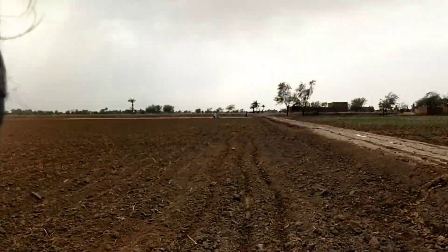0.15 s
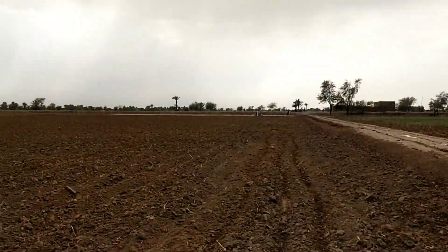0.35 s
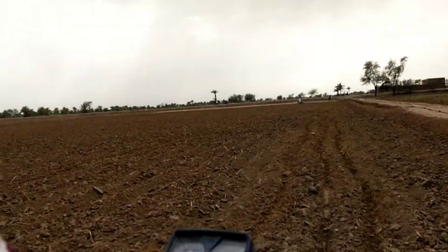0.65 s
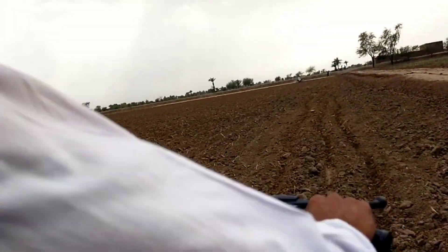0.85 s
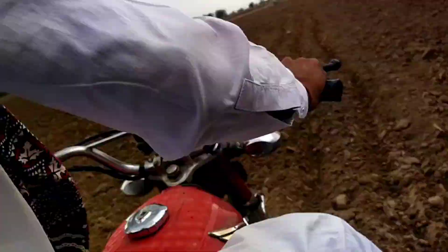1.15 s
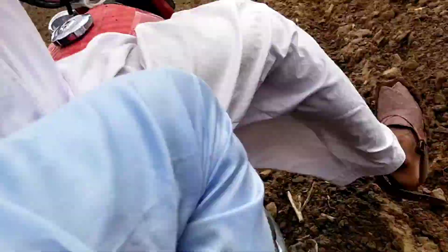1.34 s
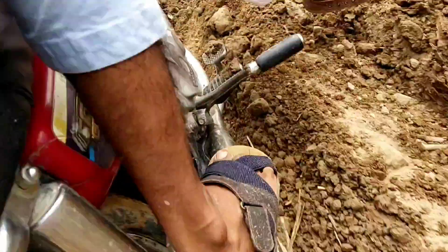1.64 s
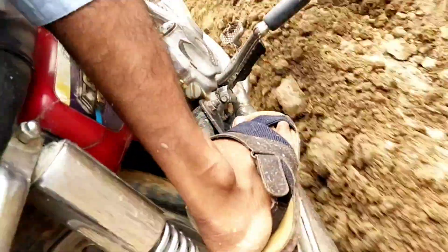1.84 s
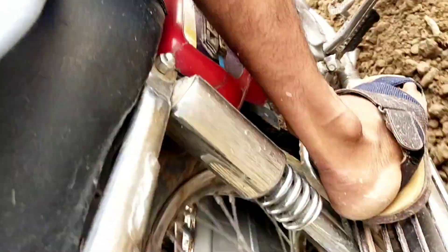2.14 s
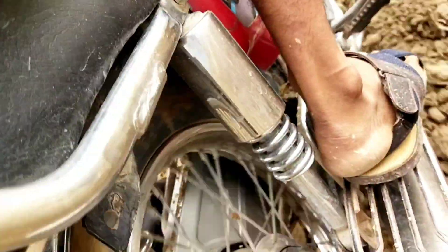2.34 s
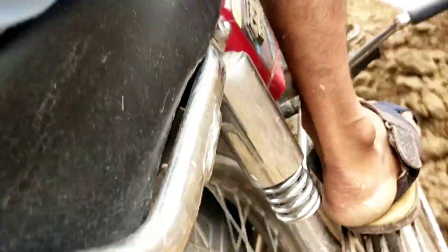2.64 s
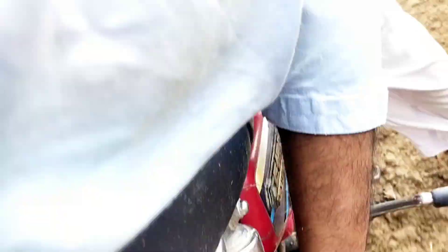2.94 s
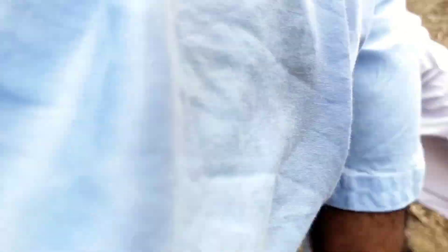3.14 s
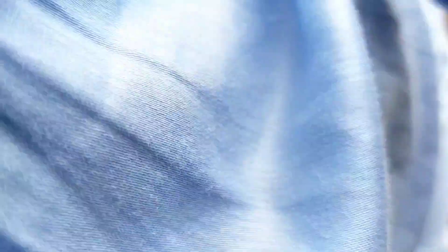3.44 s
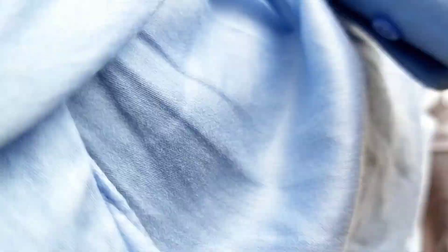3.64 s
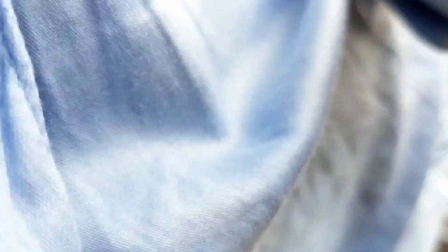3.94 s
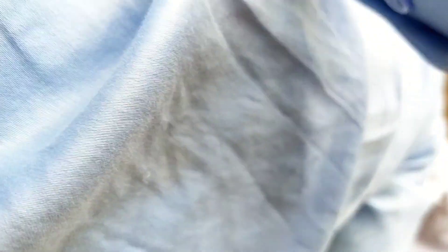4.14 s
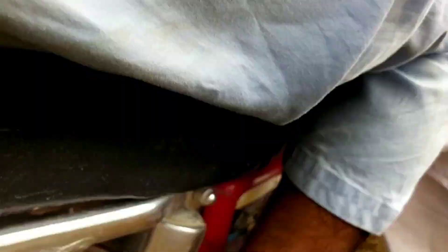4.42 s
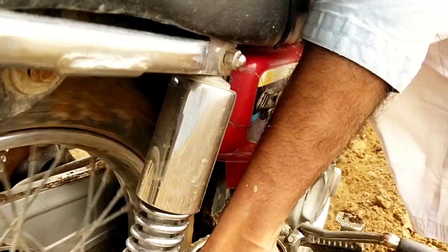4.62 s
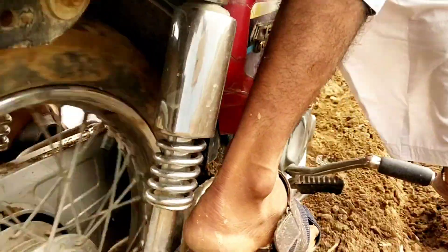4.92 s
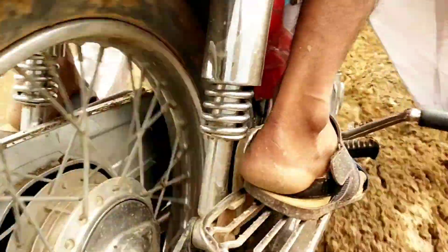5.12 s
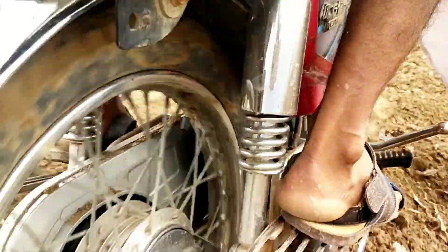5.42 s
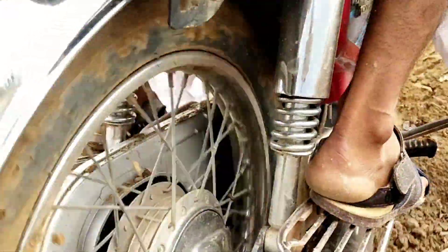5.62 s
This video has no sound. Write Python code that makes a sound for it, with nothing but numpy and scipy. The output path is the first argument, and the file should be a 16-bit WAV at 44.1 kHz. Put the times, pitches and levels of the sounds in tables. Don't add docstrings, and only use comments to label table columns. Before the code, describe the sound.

A small single-cylinder motorcycle idles continuously in an open field, about 27 uneven beats a second. A handheld phone starts near the rider's shoulder, where boom, intake thud and wind rumble are fuller, then swings down to the rear wheel, where dry pops and hissy puffs dominate. Metallic overtones swell and fade with the movement. Very close, slightly saturated stereo, no audible room.

```python
import sys
import numpy as np
from scipy import signal
from scipy.fft import rfft, irfft, next_fast_len
from scipy.io import wavfile
from scipy.ndimage import uniform_filter1d, map_coordinates

SR = 44100
rng = np.random.default_rng(int(sys.argv[2]) if len(sys.argv) > 2 else 0)


def voltage_ratio(decibels):
    exponent = np.asarray(decibels, float) / 20
    return 10 ** exponent


def master(y):
    cut = np.clip(np.atleast_2d(y).T, -1, 1)
    pcm = np.round(cut * 32767)
    wavfile.write(sys.argv[1], SR, pcm.astype(np.int16))


N = 254456
TIME = np.arange(N) / SR
ECHO_S = 0.00621

# (time [s], silencer body in view [dB],
# left ear later than right [ms], air box in view [dB], blow level [dB])
PHONE = [(0.0, -6, -0.17, -14, -2.5), (0.15, -4, -0.14, -8.5, -0.5), (0.5, -2, 0.027, -13.5, -2.5),
         (0.87, -4, -0.034, -12, -1.5), (1.2, -4.5, -0.086, -14.5, -3), (1.42, -13, -0.145, -31, 0.5),
         (1.8, -12, -0.15, -22, 0), (2.0, -13.5, -0.3, -26, -2), (2.2, -10, -0.31, -23, -1.5),
         (2.6, -13, -0.29, -24, -2.4), (3.05, -6, -0.15, -22.5, 0), (3.42, -10, -0.14, -27, -2.5),
         (3.6, -11.5, -0.128, -23.5, -3.5), (4.2, -14, 0.11, -38, -4.5), (4.5, -15, 0.23, -39, -1),
         (5.0, -12.5, 0.15, -39, -2), (5.4, -17, 0.13, -40, -1), (5.77, -15, 0.16, -30, -4.5)]


def evened(x):
    return x / np.sqrt(np.mean(x ** 2) + 1e-20)


def column(table, index, t=TIME):
    rows = np.array(table)
    return np.interp(t, rows[:, 0], rows[:, index])


def coloured(x, points):
    hz, db = np.transpose(points)
    size = next_fast_len(N)
    bins = np.fft.rfftfreq(size, 1 / SR)
    gain = voltage_ratio(np.interp(np.log(bins + 1), np.log(hz), db))
    return irfft(rfft(x, size) * gain, size)[..., :N]


def resonated(x, modes):
    total = 0
    for hz, width, db in modes:
        total = total + voltage_ratio(db) * signal.lfilter(*signal.iirpeak(hz, hz / width, SR), x)
    return total


def gliding(x, hz, width):
    turn = np.exp(2j * np.pi * np.cumsum(hz) / SR)
    r = np.exp(-np.pi * width / SR)
    return 2 * (turn * signal.lfilter([1 - r], [1, -r], x / turn)).real


def pair(same):
    common, left, right = rng.standard_normal((3, N))
    same = np.clip(same, 0, 1)
    return np.sqrt(same) * common + np.sqrt(1 - same) * np.array([left, right])


def patchy(x, patchy_db):
    z = signal.stft(x, nperseg=256)[2]
    spots = rng.standard_normal(z.shape[1:])
    spots = evened(uniform_filter1d(uniform_filter1d(spots, size=5, axis=0), size=7, axis=1))
    return signal.istft(z * voltage_ratio(patchy_db * spots), nperseg=256)[1][:, :N]


def burst(since, rise, fall):
    return np.exp(-np.maximum(since, 0) / fall) * np.exp(-(np.minimum(since, 0) / rise) ** 2)


def firings():
    # (firing number, gap to the next firing [ms])
    idle = [(0.0, 33.278), (10.66, 39.562), (23.6, 53.559), (30.96, 33.163), (46.84, 38.152),
            (51.98, 37.162), (57.01, 45.748), (63.4, 38.78), (66.53, 42.096), (82.64, 41.903),
            (83.84, 37.985), (105.78, 36.797), (112.7, 33.298), (122.61, 36.095), (127.15, 33.094),
            (133.0, 39.397), (137.5, 32.172), (150.0, 37.477)]
    first_firing_s = 0.0117
    number, gap_ms = np.transpose(idle)
    fired = np.cumsum(np.interp(np.arange(-10, 156) + .5, number, gap_ms)) / 1000
    return first_firing_s + fired - fired[9]


def cycle(fired, lead):
    number = np.searchsorted(fired - lead, TIME) - 1
    since = TIME - fired[number]
    return number, since, since / np.diff(fired)[number]


def speeding(fired):
    return 1 / np.gradient(fired) - 27


def in_view():
    return column(PHONE, index=1) + 13


def wind():
    # (frequency [Hz], density [dB per Hz])
    wind_colour = [(15, 17), (30, 36), (40, 39), (52, 0), (100, 4), (220, -14), (600, -18)]
    lumps = evened(uniform_filter1d(uniform_filter1d(rng.standard_normal(N), size=5000), size=5000))
    high_db = 1.4 * (in_view() + 4)
    return voltage_ratio(-40 + high_db + 0.83 * lumps) * evened(coloured(pair(0.092), wind_colour))


def rustle(fired):
    # (frequency [Hz], density [dB per Hz])
    rustle_colour = [(900, 6.5), (1800, -2.5), (3200, -3), (5500, -11.5), (6800, -6), (8100, -14),
                     (15200, -23)]
    _, _, share = cycle(fired, lead=0)
    valves = 0.19 + 0.51 * np.exp(-((share - .63) / 0.081) ** 2) + .5 * np.exp(-((share - .9) / 0.17) ** 2)
    drops = (rng.random((2, N)) < 400 / SR) * voltage_ratio(3.0 * np.minimum(rng.exponential(1, (2, N)), 4))
    patter = signal.lfilter([1, -1], [1, -.8], drops)
    busy_db = 0.69 * np.interp(TIME, fired, speeding(fired)) + 0.53 * in_view()
    noise = valves * patchy(pair(0.27), patchy_db=3.5) + 0.071 * evened(patter)
    return voltage_ratio(-28 + busy_db) * evened(coloured(noise, rustle_colour))


def intake(fired, luck):
    number, _, share = cycle(fired, lead=0)
    opening = share - .66
    thud = np.cos(2 * np.pi * 11.3 * opening) * burst(opening, rise=0.035, fall=0.53)
    thud = thud * voltage_ratio(4.4 * luck[number, 3])
    hz = uniform_filter1d(9.65 / np.diff(fired)[number], size=2000)
    rumble = resonated(pair(0.14), [(105, 43, 0.0), (218, 39, -2.6)])
    rumble = evened(resonated(rumble, [(157, 120, 0)]))
    gurgle = evened(gliding(gliding(pair(0.81), hz, width=190), hz, width=190))
    gurgle = gurgle * (0.11 + np.exp(-((share - .8) / 0.37) ** 2))
    return voltage_ratio(column(PHONE, index=3) - 6.5) * evened(evened(thud) + 0.67 * gurgle + .5 * rumble)


def lobes_db(tone):
    # (middle [s], half length [s], swell [dB])
    swells = [
        [(.3, .35, 15.5), (1.4, 0.34, 19.5), (1.78, 0.22, 7.5), (3.3, 0.67, 13.5), (4.0, 0.43, 5.5)],
        [(.3, 0.82, 13.5), (1.1, 0.34, 2), (2.493, .2, 8), (3.25, 0.58, 19), (5.2, 1, 9)],
        [(.25, 0.35, 11.5), (1.3, 0.12, 6.5), (2.0, .1, 6), (3.0, 0.23, 11), (3.6, 0.32, 11.5)],
        [(.35, 0.36, 14.5), (.9, 0.13, 6), (1.3, 0.13, 5), (2.0, 0.22, 9), (3.05, .2, 6), (3.602, 0.4, 16.5),
         (4.6, 0.24, 7), (5.4, 0.34, 8.5)],
        [(1.8, 0.73, 8), (3.7, 0.87, 8.5), (4.7, .3, 7.5)],
        [(.4, .15, 17), (3.0, .2, 26), (3.55, 0.38, 27), (5.4, 0.18, 9)],
    ]
    floors_db = [-40, -42, -38.5, -41.5, -39, -56]
    bells = sum(db * np.exp(-((TIME - middle) / half) ** 2) for middle, half, db in swells[tone])
    return floors_db[tone] + bells


def overtones(fired):
    # (frequency [Hz], width [Hz], level [dB])
    tone_modes = [
        [(621, 70, 0.5), (465, 150, 1.5)],
        [(732.6, 98, 0)],
        [(1010, 48, 6.5), (1117, 265, 10.5)],
        [(1294, 86, 8), (1595, 95, 0), (1464, 630, 4)],
        [(382, 117, 0)],
        [(884, 100, 0)],
    ]
    _, since, share = cycle(fired, lead=0.0064)
    strikes = evened(np.diff(cycle(fired, lead=0)[0], prepend=0).clip(0, 1))
    gas = 1.5 + 1.9 * burst(since - .001, rise=0.0029, fall=0.03)
    gas = gas + 2.4 * np.exp(-((share - .8) / 0.39) ** 2)
    flow = evened(gas * pair(.9)) + 2.2 * strikes
    drive = signal.lfilter([1, -1], [1, -.93], flow)
    total = 0
    for tone, modes in enumerate(tone_modes):
        ring = evened(resonated(resonated(drive, modes), modes))
        total = total + voltage_ratio(lobes_db(tone)) * ring
    return voltage_ratio(-1.0) * total


def jet(fired, luck):
    # (frequency [Hz], width [Hz], level [dB])
    whistle_modes = [(2200, 290, -2), (2800, 440, 1), (3150, 260, 3.5), (3690, 790, -1.5),
                     (4000, 650, -2.5)]
    # (frequency [Hz], density [dB per Hz])
    jet_colour = [(1000, -3), (1900, -8.5), (4200, 1), (6600, 1), (7600, -10.5), (8600, -1), (11000, -3),
                  (15200, -5.5)]
    # (frequency [Hz], width [Hz], level [dB])
    shell_modes = [(6330, 130, -2.5), (6850, 180, -2), (7250, 370, -1.5)]
    # (time [s], whistle level [dB], whistle centre [Hz], jet level [dB])
    outlet = [(0.05, -25, 2940, -36.5), (0.22, -26, 3030, -31.5), (0.38, -25.5, 3030, -28),
              (0.65, -26.5, 2950, -29.5), (1.0, -25, 2740, -30.5), (1.2, -19.5, 2700, -30.5),
              (1.45, -30.5, 2440, -32), (1.75, -32, 2930, -28.5), (2.05, -21.5, 2860, -28),
              (2.62, -25, 3150, -26.5), (3.05, -29.5, 2780, -30), (3.5, -26, 3240, -28.5),
              (3.75, -24.5, 2820, -26), (4.15, -22, 3600, -25.5), (4.6, -26.5, 3150, -27),
              (5.05, -25.5, 2410, -27), (5.3, -16.5, 2760, -32), (5.77, -16, 2700, -23)]
    number, since, _ = cycle(fired, lead=0.0035)
    flow = burst(since - .0012, rise=0.00085, fall=0.0019)
    flow = flow + .11 * burst(since - ECHO_S, rise=.003, fall=.002)
    flow = flow + 0.048 * burst(since, rise=0.0013, fall=0.023)
    late = burst(since - .002, rise=0.0032, fall=0.0018)
    late = late + 0.4 * burst(since - ECHO_S - .002, rise=0.0071, fall=0.0065)
    whistle_luck = voltage_ratio(1.3 * luck[number, 1])
    hiss_luck = voltage_ratio(1.1 * luck[number, 2])
    whistle = resonated(late * whistle_luck * pair(0.49), whistle_modes)
    whistle = evened(gliding(whistle, column(outlet, index=2), width=690))
    rush = flow * hiss_luck * patchy(pair(0.5), patchy_db=3.0)
    hiss = evened(evened(coloured(rush, jet_colour)) + .4 * evened(resonated(rush, shell_modes)))
    return voltage_ratio(column(outlet, index=1) - 4.0) * whistle + voltage_ratio(column(outlet, index=3) + 4.0) * hiss


def blow(fired, strength):
    number, since, _ = cycle(fired, lead=.004)
    blunt = voltage_ratio(0.25 * (column(PHONE, index=1, t=fired)[number] + 16))

    def push(u):
        suction = burst(u - .0012, rise=0.00063, fall=0.00093)
        return np.exp(-(u / 0.00054) ** 2) - 0.31 * blunt ** 2 * suction

    copies = push(since / blunt) + 0.16 * push((since - ECHO_S) / 1.11)
    return voltage_ratio(column(PHONE, index=4)) * strength[number] * copies


def boom(fired, strength):
    number, since, _ = cycle(fired, lead=.002)
    hz = 141.6 + 1.28 * speeding(fired)
    lag_s = 0.0074 - 0.00015 * speeding(fired)

    def ring(n, u):
        return strength[n] * voltage_ratio(-540 * u) * np.cos(2 * np.pi * hz[n] * (u - lag_s[n]))

    fresh = np.sin(np.pi / 2 * np.clip((since - .0028) / .0057, 0, 1)) ** 2
    fading = np.cos(np.pi / 2 * np.clip((since + .002) / .005, 0, 1)) ** 2
    tone = evened(fresh * ring(number, since) + fading * ring(number - 1, TIME - fired[number - 1]))
    flutter = evened(resonated(pair(0.15), [(126, 37.6, 0)]))
    return voltage_ratio(column(PHONE, index=1) - 5.5) * (tone + 0.32 * flutter)


def scene():
    fired = firings()
    luck = rng.standard_normal((len(fired), 5))
    motor = rustle(fired) + intake(fired, luck) + overtones(fired) + jet(fired, luck)
    motor = motor + blow(fired, voltage_ratio(0.23 * luck[:, 4])) + boom(fired, voltage_ratio(0.48 * luck[:, 0]))
    half = column(PHONE, index=2) * SR / 2000
    ears = []
    for ear, side in zip(motor, (-1, 1)):
        ears.append(map_coordinates(ear, [np.arange(N) + side * half], order=3, mode="nearest"))
    return np.array(ears) * voltage_ratio(np.outer([1, -1], 0.033 * half - .2)) + wind()


def gated(x, depth_db):
    z = signal.stft(x, nperseg=256, noverlap=192)[2][:, :128]
    power = (abs(z) ** 2).mean(axis=0).reshape(32, 4, -1).mean(axis=1)
    band_db = 10 * np.log10(uniform_filter1d(power, size=5, axis=1) + 1e-20)
    loud_db = 10 * np.log10(uniform_filter1d(power[4:24].mean(axis=0), size=40) + 1e-20)
    chance = evened(uniform_filter1d(rng.standard_normal(power.shape), size=5, axis=1))
    limit_db = loud_db - depth_db - .72 * np.arange(32)[:, None] + 5.0 * chance
    faint = np.repeat(band_db < limit_db, 4, axis=0) & (np.arange(128)[:, None] > 19)
    lost = np.pad(z * faint, [(0, 0), (0, 1), (0, 0)])
    return x - signal.istft(lost, nperseg=256, noverlap=192)[1][:, :N]


def band_limit(x):
    return signal.sosfilt(signal.butter(12, 16470, fs=SR, output="sos"), x)


def record(dry):
    opening = np.minimum(TIME / 0.011, 1) ** 2
    bass_cut = signal.butter(2, 75, "high", fs=SR, output="sos")
    cut = signal.sosfilt(bass_cut, dry * opening)
    held = np.tanh(abs(cut) ** 3.0) ** (1 / 3.0) * np.sign(cut)
    held = signal.oaconvolve(held, signal.firwin(127, 15760, fs=SR)[None], "same")
    mix = gated(held, depth_db=8)
    return band_limit(mix)


dry = scene()
out = record(dry)
master(out)
```